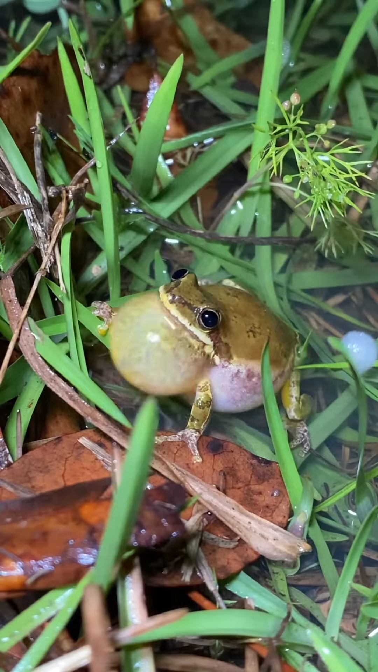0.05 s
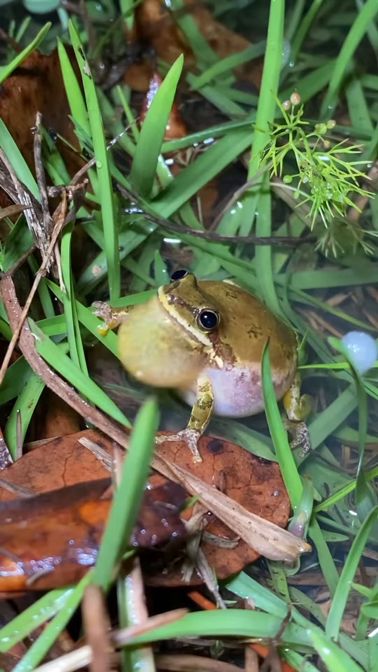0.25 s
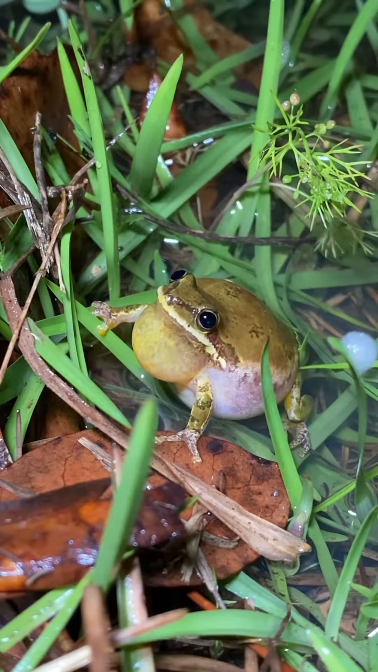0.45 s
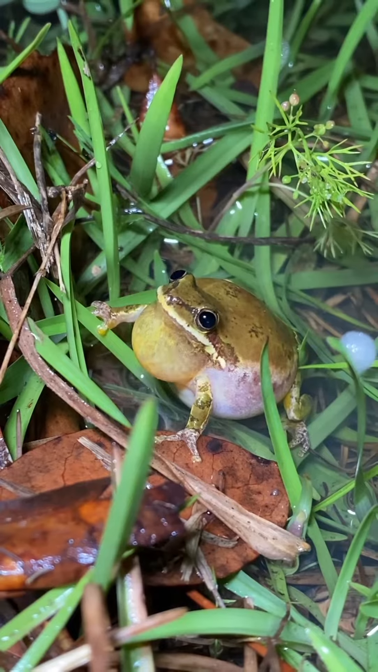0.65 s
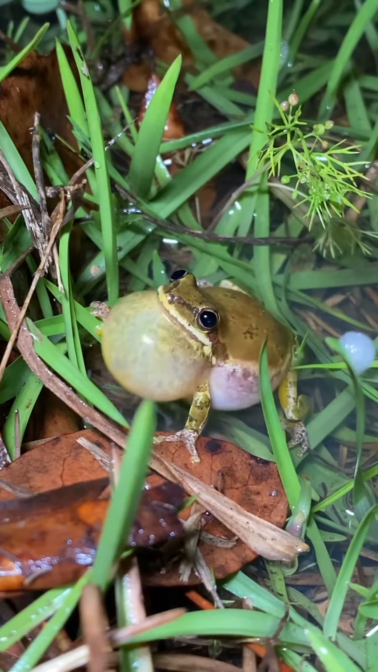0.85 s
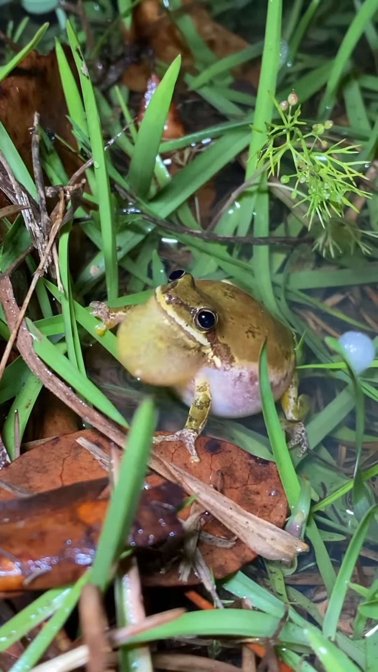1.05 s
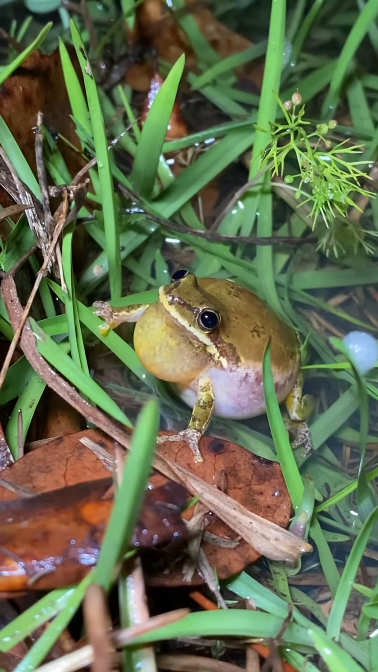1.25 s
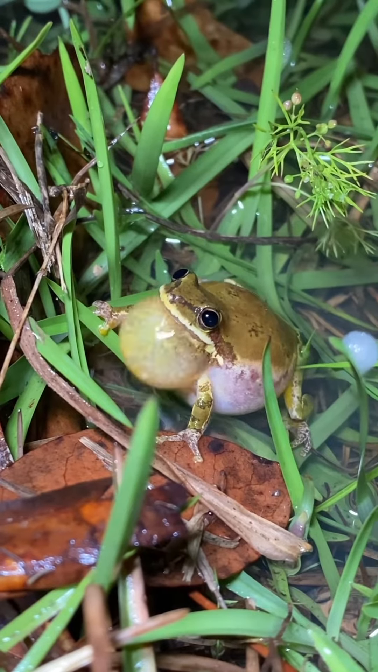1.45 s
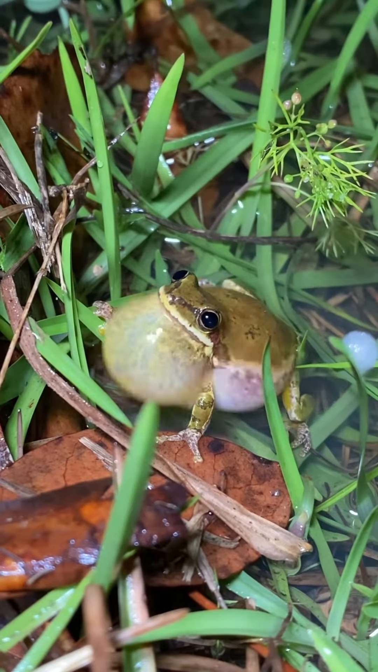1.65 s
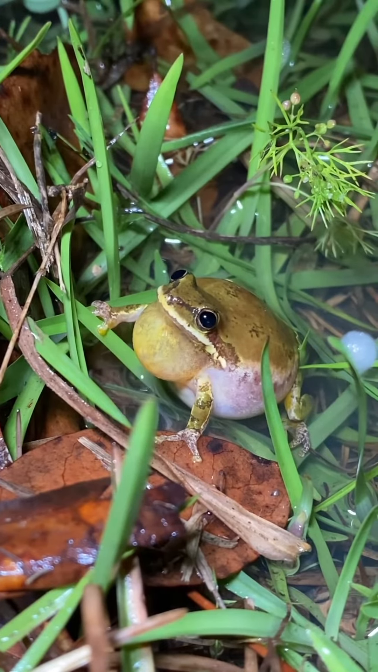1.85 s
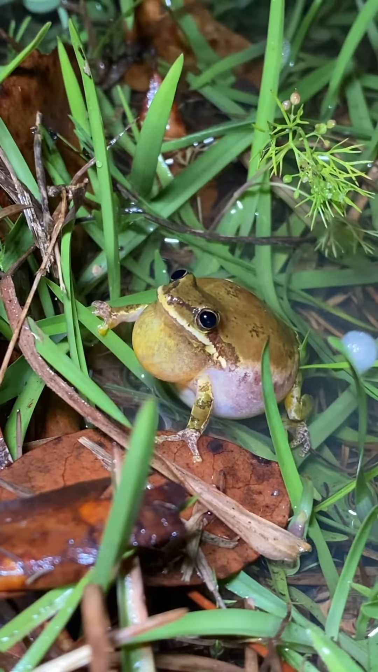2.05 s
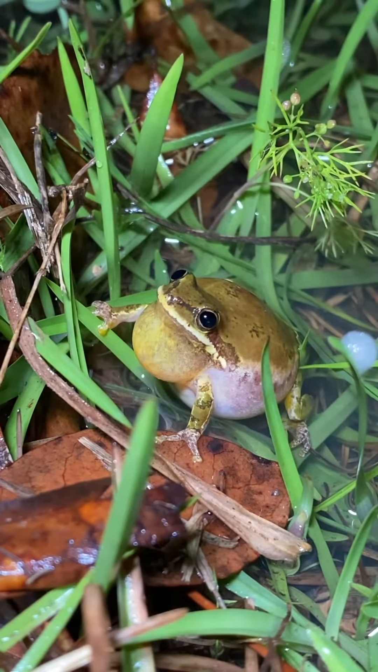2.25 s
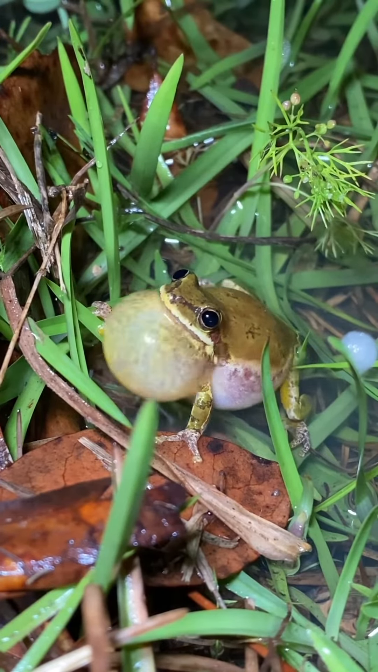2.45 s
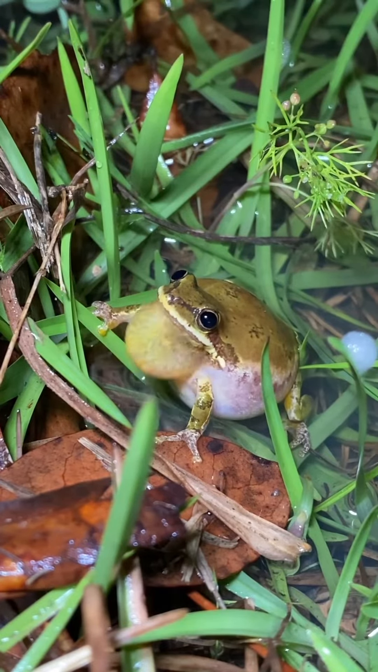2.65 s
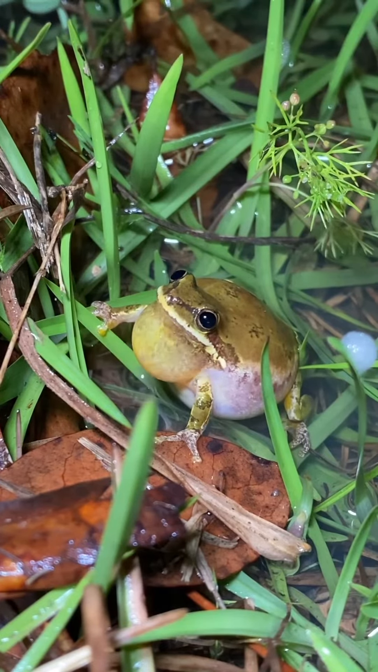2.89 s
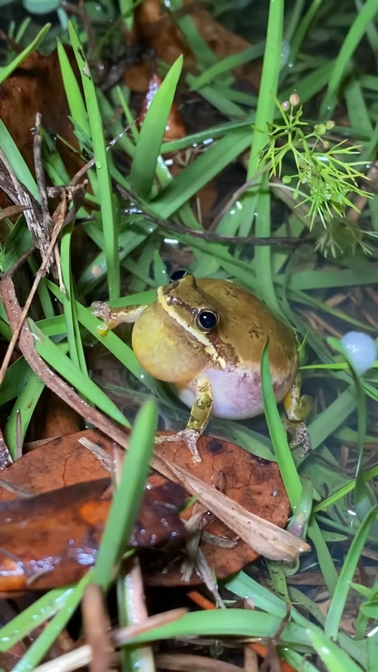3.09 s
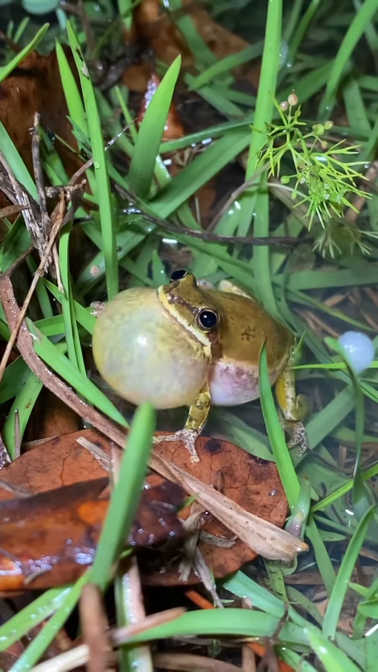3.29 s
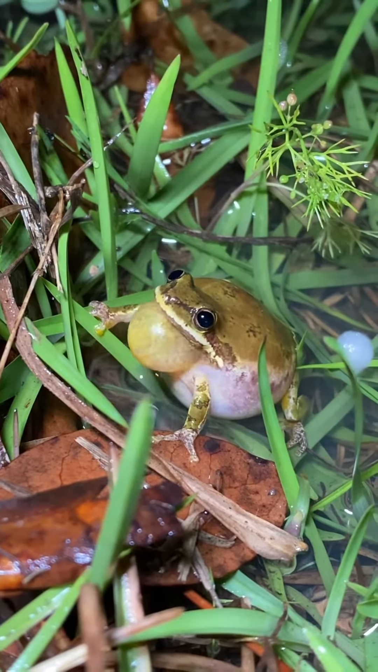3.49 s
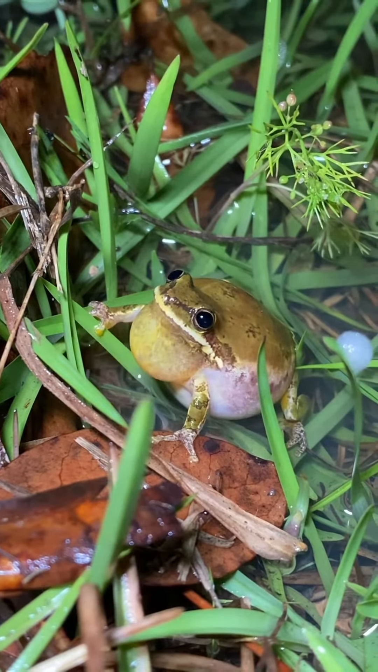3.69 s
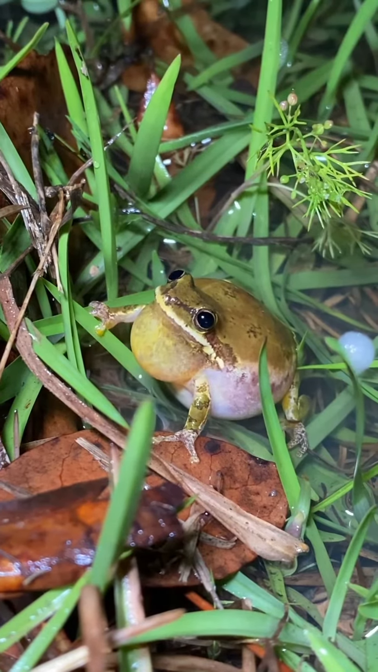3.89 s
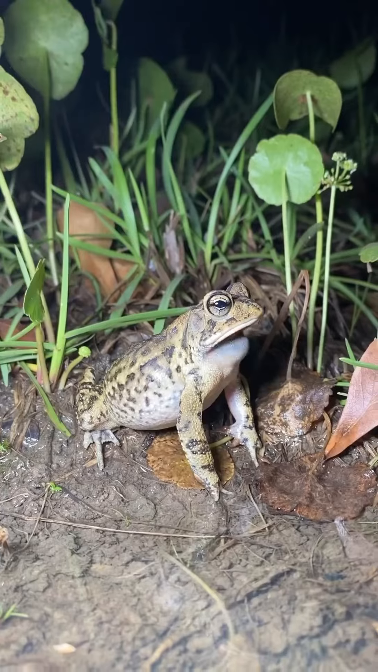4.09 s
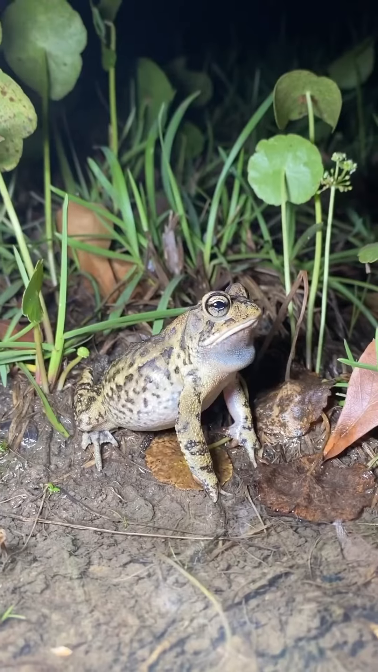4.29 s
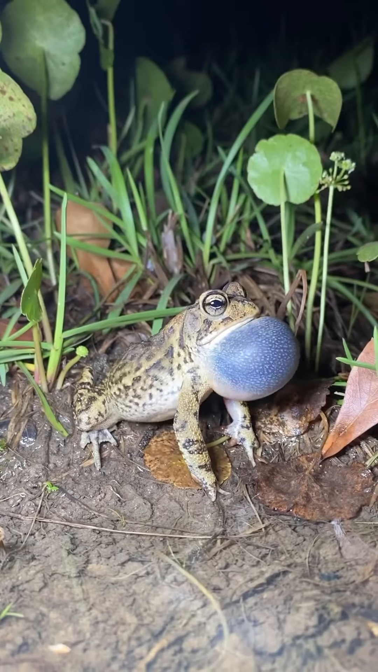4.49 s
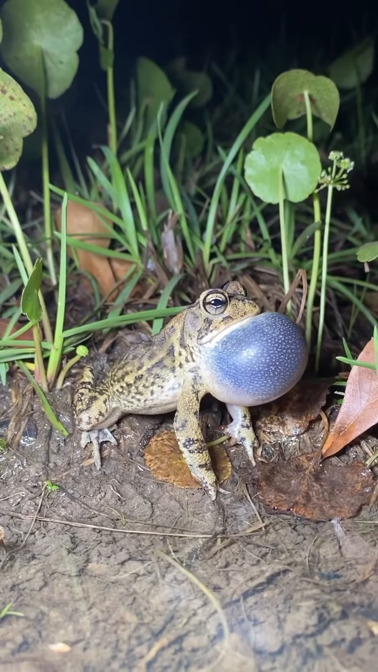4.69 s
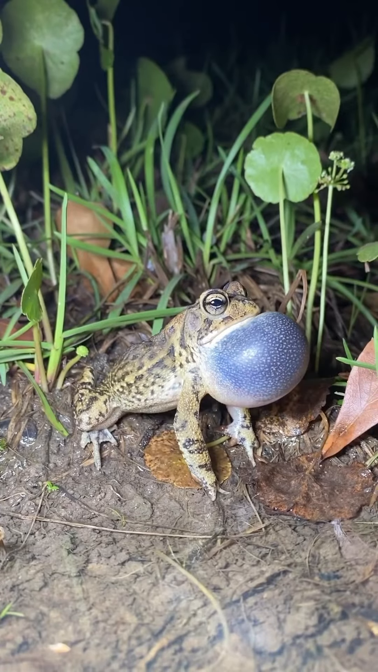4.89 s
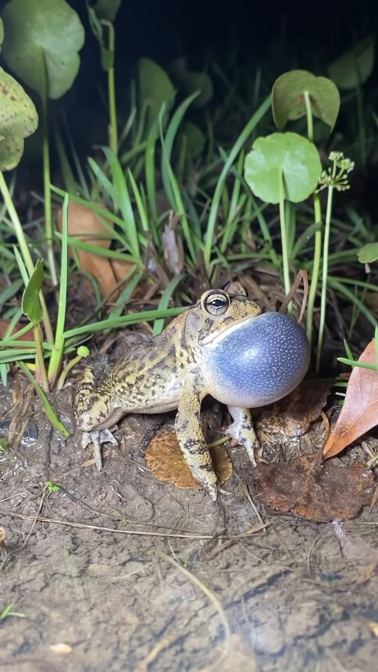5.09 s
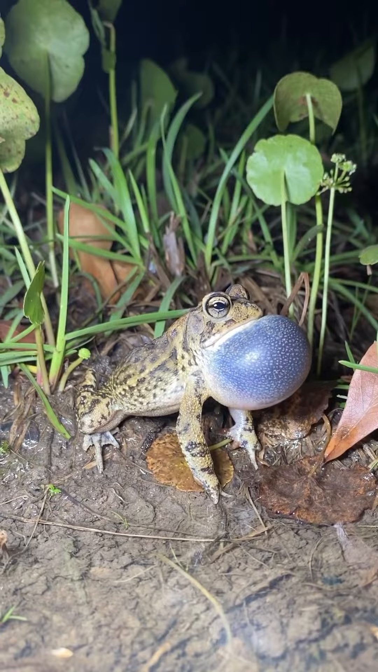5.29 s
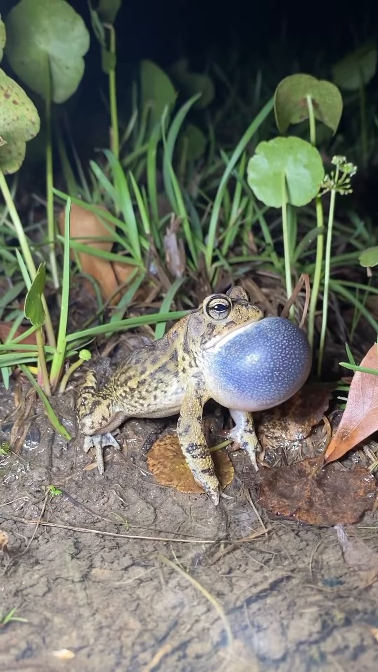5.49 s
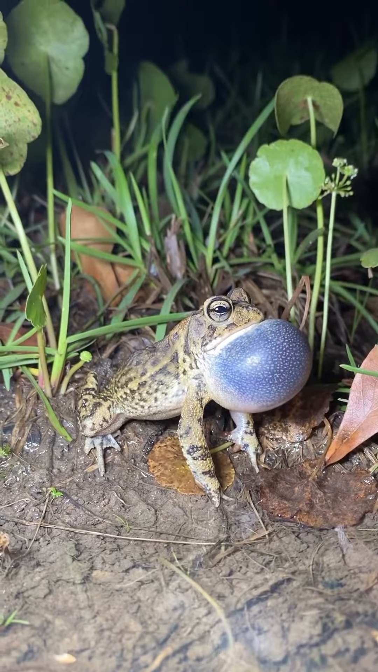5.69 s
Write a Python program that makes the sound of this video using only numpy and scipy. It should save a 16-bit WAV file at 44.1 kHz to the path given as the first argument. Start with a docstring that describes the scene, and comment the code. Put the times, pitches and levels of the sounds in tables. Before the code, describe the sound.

Short, buzzy frog croaks with neighbours answering and a faint cricket cut to a toad's steady, whistling trill at night.

```python
"""Night at a pond edge. A tree frog croaks close by: vocal-fold impulses, about 100 pulses a second,
excite the resonances of its throat and sac. Neighbours answer over a cricket and a far chorus, and one
short pop sounds at 1.3 s. Near 4 s the scene cuts to a quieter bank with two faint answers.
There a toad swells into a long, steady trill of whistled pulses, rising in level as its sac fills."""
import sys
import numpy as np
from scipy import signal
from scipy.fft import rfft, irfft
from scipy.io import wavfile
from scipy.ndimage import uniform_filter1d

SR = 44100
rng = np.random.default_rng(int(sys.argv[2]) if len(sys.argv) > 2 else 0)


def to_wav(s):
    """Save 16-bit WAV."""
    ch = np.atleast_2d(s).T  # columns
    pcm = np.round(np.clip(ch, -1, 1) * 32767)  # PCM
    wavfile.write(sys.argv[1], SR, pcm.astype(np.int16))


N = 253134
TIME = np.arange(N) / SR
PULSE_HZ = np.fft.rfftfreq(2048, 1 / SR)
CUT_S, BANK_S, TRILL_START_S = 3.9545, 3.976, 4.4223  # near frog ends, bank begins, toad begins

# Croaks: (first pulse [s], last pulse [s], pause to cluck [s], cluck level [dB], second cluck [dB])
CROAKS = [(-.0566, .0723, .0107, -20.5, -34), (.7193, .869, .014, -25, -40),
          (1.3664, 1.5055, .0105, -21, -22), (2.2954, 2.4243, .0103, -20, -34),
          (3.0712, 3.221, .0137, -24.5, -38), (3.9243, 4.0737, .014, -24, -38)]
# Response of the near frog's body: (frequency [Hz], gain [dB])
FROG_BODY = [(200, -40), (550, -40.5), (830, -12.5), (1100, -2.5), (1400, -9), (1800, -7.5), (2500, -6),
             (3200, -6), (3900, -27), (4600, -22), (5600, -33.5), (6700, -57), (9400, -31), (13000, -55)]
def near_frog(pulses_per_s=101, tighten_share=.68, sac_fill_s=.032):
    """Source and filter: tightening folds rise in pitch, while the sac rings less as it fills."""
    out, body = np.zeros(N), minimum_phase(FROG_BODY)
    slack_hz, tight_hz = 1100, 1425
    sac_hz, sac_width_hz, full_db, empty_db = 1052, 86, 6.5, 25
    for first, last, pause, cluck_db, second_db in CROAKS:
        share = np.linspace(0, 1, round((last - first) * pulses_per_s) + 1)
        centred = 2 * share - 1
        times = first + (last - first) * share + .002 * (centred ** 5 - centred)  # slower at both ends
        times += np.cumsum(.00006 * rng.standard_normal(len(times)))  # each period wavers
        levels = -14.5 + envelope_db(share, rise=.06, rise_db=1, fall=.7, fall_db=4.5)
        pitches = glide(share / tighten_share, slack_hz, tight_hz)
        for s, db, fold_hz in zip(times, levels, pitches):
            empty = np.exp((first - s) / sac_fill_s)
            sac = resonance(sac_hz, sac_width_hz, full_db + (empty_db - full_db) * empty)
            bright_edge = resonance(hz=4690, width_hz=1300, db=14.5 * empty)
            throat = resonance(2 * fold_hz, width_hz=290, db=8)
            add_pulse(out, s, db, fold_hz, body * throat * sac * bright_edge, jitter=.018)
        # a faint pulse opens the croak and two clucks close it
        lead_in = body * resonance(sac_hz, sac_width_hz, full_db)
        add_pulse(out, first - .0097, db=-24.5, fold_hz=slack_hz, body=lead_in, jitter=.03)
        add_cluck(out, last + pause, cluck_db)
        add_cluck(out, last + pause + .026, second_db)
    heard = place(out, lead_samples=1.3, balance_db=-1.3) + scatter(out, t60=.08, wet_db=-17)
    return heard * np.clip((CUT_S - TIME) / .0005, 0, 1)


# Slaps of the vocal folds within one pulse: (delay [fold cycles], level [dB])
FOLD_SLAPS = [(-2.5, -8.5), (-7.5, -15), (-0.5, 3.5), (0.5, -10.5), (2.28, -2)]
def add_pulse(mix, s, db, fold_hz, body, jitter):
    """Superposition: each slap of the folds excites a delayed copy of the body's impulse response."""
    cycles, slap_db = np.transpose(FOLD_SLAPS)
    margin_s = 256 / SR
    delays = margin_s + (cycles + jitter * rng.standard_normal(len(cycles))) / fold_hz
    slaps = amp(slap_db) @ np.exp(-2j * np.pi * np.outer(delays, PULSE_HZ))
    pulse = irfft(body * slaps)
    pulse *= np.sqrt(SR / 100 / np.sum(pulse ** 2))  # unit rms over 10 ms
    add(mix, s - margin_s, amp(db) * pulse)


# Harmonics of a cluck: (frequency [multiple of the fundamental], level [dB])
CLUCK_HARMONICS = [(1, -3), (2, -3.5), (3, -4.5)]
def add_cluck(mix, s, db, length_s=.0094):
    """Free vibration: the slack folds swing for a few cycles, a pitched blip centred on time s."""
    t = TIME[TIME < length_s]
    hz = 1063 + 13 * (db + 23)  # weaker clucks are lower
    tone = sum(amp(db_k) * np.sin(2 * np.pi * (k * hz * t + rng.random())) for k, db_k in CLUCK_HARMONICS)
    add(mix, s - length_s / 2, amp(db) * unit_rms(np.hanning(len(t)) * tone))


# Pace of the trill: (time [s], rate [pulses/s])
TRILL_RATE = [(4.423, 58.58), (4.687, 62.07), (5.15, 59.19), (5.74, 56.78)]
# Overtones of the whistle: (frequency [multiple of the fundamental], level [dB], change at onset [dB])
TOAD_OVERTONES = [(2.07, -39, 9), (2.889, -51, 11), (5.14, -49.5, -14.5)]
# Air rasping through the toad's folds: (frequency [Hz], spectral density [dB])
RASP = [(200, -23.5), (600, -1.5), (1300, 6), (3300, -10), (4700, -9), (5900, -10), (6800, -27.5),
        (9600, -16.5), (12500, -37.5), (15200, -22.5)]
def toad(pulse_s=.0113, rasp_likeness=.77, overtone_settle_s=.26, body_hz=1164, knock_s=.002):
    """Amplitude and frequency modulation: each pulse is a whistle that swells and sags in pitch."""
    out, t = np.zeros(N), TIME[:SR // 70]
    pulse_count = np.cumsum(curve(TRILL_RATE, TIME)[0] * (TIME >= TRILL_START_S)) / SR
    times = TIME[1:][np.diff(np.ceil(pulse_count)) > 0]
    breath = coloured_noise(RASP, COHERENCE)[0]
    common_rasp, *fresh_rasps = breath[:(len(times) + 1) * len(t)].reshape(-1, len(t))
    # each pulse knocks the body into a low ring
    knock = amp(-30) * t / knock_s * np.exp(1 - t / knock_s) * np.sin(2 * np.pi * body_hz * t)
    for s, fresh_rasp, db, hz, harsh in zip(times, fresh_rasps, *trill_contour(times - TRILL_START_S)):
        level_drift, speed_drift, pitch_drift = rng.standard_normal(3)
        share = np.minimum(t * (1 + .066 * speed_drift) / pulse_s, 1)
        swell = share ** 1.35 * (1 - share) ** 2.7  # quick rise, slower fall
        swell /= swell.max()
        sag = 1.0086 - .42 * share ** 3.16
        phase = 2 * np.pi * np.cumsum(hz * sag * (1 + .003 * pitch_drift)) / SR
        early = np.exp((TRILL_START_S - s) / overtone_settle_s)
        overtones = sum(amp(db_k + early * lift) * np.sin(k * phase) for k, db_k, lift in TOAD_OVERTONES)
        snap = amp(5) * harsh * np.exp(-((t - .0021) / .0008) ** 2) * np.sin(phase)  # the folds snap open
        whistle = unit_rms(swell * (np.sin(phase) + overtones) + snap)
        rasp = rasp_likeness * common_rasp + np.sqrt(1 - rasp_likeness ** 2) * fresh_rasp
        rasp *= amp(-41) + harsh * amp(-19)
        add(out, s, amp(db + .5 * level_drift) * (whistle + swell * rasp + knock))
    return place(out, lead_samples=-1.5, balance_db=.1) + scatter(out, t60=.06, wet_db=-25)


def trill_contour(age_s, fill_s=.065, drop_after_s=.35, scoop_s=.096, harsh_s=.14, taut_harshness=.17):
    """Onset transient: level and pitch climb and harshness fades as the slack sac fills."""
    since_drop_s = np.maximum(age_s - drop_after_s, 0)
    db = -13.5 - 20.5 * np.exp(-age_s / fill_s)
    db -= 1.98 * (since_drop_s > 0) + 3 * since_drop_s  # the level steps down 2 dB, then slowly fades
    hz = 2007 - 457 * np.exp(-age_s / scoop_s) + 67.6 * age_s
    slack = np.maximum(1 - (age_s / harsh_s) ** 2, 0)
    return db, hz, taut_harshness + (1 - taut_harshness) * slack


# Neighbours' calls: (start [s], end [s], level [dB], top fold pitch [Hz])
ANSWERS = [(0.131, .411, -35, 1575), (0.293, 0.524, -32.5, 1663), (.988, 1.247, -34.5, 1495),
           (1.065, 1.356, -32, 1603), (1.515, 1.746, -33.5, 1392), (1.638, 1.828, -35, 1660),
           (1.847, 2.108, -30.5, 1593), (1.982, 2.165, -38.5, 1690), (2.151, 2.221, -39.5, 1440),
           (2.235, 2.42, -33.5, 1365), (2.486, 2.774, -34.5, 1583), (2.658, 2.871, -33, 1672),
           (3.357, 3.619, -32.5, 1513), (3.403, 3.722, -37.5, 1696), (3.756, 4.015, -39.5, 1633),
           (4.149, 4.334, -52.5, 1670), (4.378, 4.47, -56.5, 1450)]
# Response of a neighbour's body, heard through grass: (frequency [Hz], gain [dB])
FAR_BODY = [(300, -38), (800, -20.5), (1200, -11), (1500, -20), (1900, -4), (2400, -16), (3100, 1),
            (3500, -6.5), (3900, -18), (4500, -13.5), (7200, -61), (10000, -27), (12500, -46),
            (15200, -47.5)]
# Direct and reflected paths; low tones arrive mostly by reflection: (frequency [Hz], gain [dB])
DIRECT_PATH = [(1700, -9.5), (2700, 1.5)]
REFLECTED_PATH = [(1700, -3), (2700, -1)]
def neighbours(pulses_per_s=96, typical_fold_hz=1598, dull_below_db=-35):
    """Acoustic scaling: smaller frogs have higher folds, and their body resonances rise in step."""
    out, sac = np.zeros(N), resonance(hz=1300, width_hz=430, db=14.5)
    treble = np.clip((PULSE_HZ - 3500) / 1200, 0, 1)
    rates = pulses_per_s * np.exp(.05 * rng.standard_normal(len(ANSWERS)))
    for (start, end, db, top_hz), rate in zip(ANSWERS, rates):
        times = np.arange(start, end, 1 / rate)
        times += .00018 * rng.standard_normal(len(times))
        share = np.linspace(0, 1, len(times))
        levels = db + envelope_db(share, rise=.23, rise_db=10, fall=.046, fall_db=4)
        body = sac * minimum_phase([(hz * top_hz / typical_fold_hz, gain) for hz, gain in FAR_BODY])
        body *= amp(-.97 * max(dull_below_db - db, 0) * treble)  # faint, distant callers lose treble
        for s, pulse_db, fold_hz in zip(times, levels, glide(share, .88 * top_hz, top_hz)):
            throat = resonance(2 * fold_hz, width_hz=230, db=7)
            add_pulse(out, s, pulse_db, fold_hz, body * throat, jitter=.045)
    direct = place(filtered(out, DIRECT_PATH), lead_samples=.2, balance_db=.5)
    return direct + scatter(filtered(out, REFLECTED_PATH), t60=.082, wet_db=-2)


# A hard-edged pop: (time [s], duration [s], peak level [dB], frequency [Hz])
POPS = [(1.2673, 0.00431, -10, 990)]
def pop(decay_s=.0023):
    """Damped oscillation: a low ring whose abrupt start and stop spread its spectrum."""
    out = np.zeros(N)
    for s, length, db, hz in POPS:
        t = TIME[TIME < length]
        add(out, s, amp(db) * np.exp(-t / decay_s) * np.cos(2 * np.pi * hz * t))
    return place(out, lead_samples=1, balance_db=-4)


# One wing stroke: (position [share of the stroke], amplitude [relative], frequency [Hz])
WING_STROKE = [(0, 0.8, 6120), (.15, 0, 5934), (.4, 1, 5840), (.6, 0.31, 5690), (.8, 0.22, 5297),
               (1, 0, 5184)]
def cricket(start_s=.006, strokes_per_s=38.44, waver_hz=60, db=-53.5):
    """Stridulation: each wing stroke is a whistle that falls as the file slows."""
    stroke = ((TIME - start_s) * strokes_per_s) % 1
    swell, hz = curve(WING_STROKE, stroke)
    swell *= np.clip(np.minimum(stroke, 1 - stroke) / .06, 0, 1)
    waver = unit_rms(uniform_filter1d(rng.standard_normal(N), size=120))
    phase = 2 * np.pi * np.cumsum(hz + waver_hz * waver) / SR
    song = amp(db) * unit_rms(swell * np.sin(phase))
    heard = place(song, lead_samples=.5, balance_db=0) + scatter(song, t60=.12, wet_db=-9)
    return heard * (TIME < BANK_S)


# Pond chorus, its overtones, bank chorus and night air: (frequency [Hz], spectral density [dB])
POND_CHORUS = [(290, -48.5), (500, -35), (615, -57.5), (677, -20.5), (833, -32.5), (860, -19.5), (910, -22),
               (993, -17.5), (1170, 0.5), (1330, -2), (1380, -12.5), (2300, -26), (2390, -19), (2870, -2.5),
               (3370, -11.5), (4380, -31.5), (7410, -120)]
CHORUS_OVERTONES = [(3300, -40), (4400, -2), (5400, 1), (6400, -32), (8200, -35), (9500, -16), (11500, -20),
                    (13000, -44)]
BANK_CHORUS = [(240, -40.5), (400, -14), (523, -33.5), (708, -16.5), (760, -17.5), (854, -22), (1100, -4),
               (1240, 1.5), (1870, -27), (2420, -12.5), (2720, -3), (3030, -10.5), (3370, -0.5),
               (4380, -31.5), (7410, -120)]
AIR_RUMBLE = [(12, -52), (20, -27), (70, 4), (114, -4.5), (157, -8.5), (304, -19), (357, -20.5), (500, -18),
              (650, -47.5), (1100, -120)]
# Likeness of left and right: (frequency [Hz], correlation [-1 to 1])
COHERENCE = [(60, 1), (130, 0.83), (280, -0.98), (620, 0.57), (1340, -0.64), (2920, 0.96)]
def chorus_and_air(throb_db=2.5):
    """Incoherent summation: far frogs blur into noise throbbing at their pulse rates, over rumbling air."""
    pulse_rates = rng.uniform(94, 110, size=6)
    beating = unit_rms(sum(np.sin(2 * np.pi * (rate * TIME + rng.random())) for rate in pulse_rates))
    throb = unit_rms(amp(throb_db * beating))
    air = coloured_noise(AIR_RUMBLE, coherence=[(20, .95), (500, .98)])
    chorus = amp(-38.5) * coloured_noise(POND_CHORUS, COHERENCE)
    chorus += amp(-57) * coloured_noise(CHORUS_OVERTONES, COHERENCE)
    pond = throb * chorus + amp(-59) * air
    bank = amp(-57.5) * throb * coloured_noise(BANK_CHORUS, COHERENCE) + amp(-66) * air
    return np.where(TIME < BANK_S, pond, bank)


def envelope_db(share, rise, rise_db, fall, fall_db):
    """Attack, hold and release; rise and fall are shares of the call's length."""
    return -rise_db * np.maximum(1 - share / rise, 0) - fall_db * np.maximum(1 - (1 - share) / fall, 0)


def glide(share, low_hz, high_hz):
    """Tension raises pitch: the folds tighten quickly at first, then level off."""
    return low_hz + (high_hz - low_hz) * np.sin(np.pi / 2 * np.minimum(share, 1))


def resonance(hz, width_hz, db):
    """Second-order resonance: a response that lifts one band by db."""
    return 1 + (amp(db) - 1) / (1 + 1j * (PULSE_HZ ** 2 - hz ** 2) / (width_hz * PULSE_HZ + 1e-9))


def minimum_phase(colour):
    """Causal response: the phase follows from the log gain by the Hilbert transform."""
    log_gain = np.log(amp(spectrum(colour, PULSE_HZ)))
    mirrored = np.concatenate([log_gain, log_gain[-2:0:-1]])
    return np.exp(np.conj(signal.hilbert(mirrored)))[:len(PULSE_HZ)]


def place(x, lead_samples, balance_db):
    """Localisation by time and level: positive values favour the left channel."""
    left = np.exp(1j * np.pi * np.fft.rfftfreq(N) * lead_samples) * amp(balance_db / 2)
    return irfft(rfft(x) * np.array([left, 1 / left]), N)


def scatter(x, t60, wet_db):
    """Diffuse reflection: stems and banks return a short tail, independent in each channel."""
    t = TIME[:SR // 2]
    tail = rng.standard_normal((2, len(t))) * amp(-60 * t / t60) * (t > .003)
    tail /= np.linalg.norm(tail, axis=1, keepdims=True)
    return amp(wet_db) * signal.oaconvolve(x[None], tail, axes=1)[:, :N]


def coloured_noise(colour, coherence):
    """Partial coherence: shaped noise of unit rms, partly shared by the two channels."""
    hz = np.fft.rfftfreq(N, 1 / SR)
    left, independent = rfft(rng.standard_normal((2, N)))
    shared = spectrum(coherence, hz)
    right = shared * left + np.sqrt(1 - shared ** 2) * independent
    return unit_rms(irfft(np.array([left, right]) * amp(spectrum(colour, hz)), N))


def filtered(x, colour):
    """Zero-phase filtering by a table of (frequency [Hz], gain [dB])."""
    return irfft(rfft(x) * amp(spectrum(colour, np.fft.rfftfreq(N, 1 / SR))), N)


def spectrum(points, hz):
    """Interpolation on a log-frequency axis."""
    f, value = np.transpose(points)
    return np.interp(np.log(hz + 1), np.log(f + 1), value)


def curve(rows, at):
    """Linear interpolation of each column along the first."""
    first, *columns = np.transpose(rows)
    return [np.interp(at, first, c) for c in columns]


def add(mix, s, sound):
    """Superposition of a sound on the mix at time s."""
    start = round(s * SR)
    sound = sound[max(-start, 0):]
    part = mix[max(start, 0):][:len(sound)]
    part += sound[:len(part)]


def amp(db):
    """Decibels to amplitude ratio."""
    return 10 ** (np.asarray(db) / 20)


def unit_rms(x):
    """Normalisation to an rms of 1."""
    return x / np.sqrt(np.mean(x ** 2) + 1e-20)


def scene():
    """Superposition of all sources: the pond, then the toad's bank."""
    bank_answers_s = ANSWERS[-2][0]
    answers = neighbours() * ((TIME < BANK_S) | (TIME > bank_answers_s))  # pond callers end at the cut
    return near_frog() + answers + cricket() + pop() + toad() + chorus_and_air()


def record(dry):
    """Band limiting: a linear-phase low-pass at 15.9 kHz."""
    low_pass = signal.firwin(511, 15900, window=("kaiser", 9), fs=SR)
    return signal.oaconvolve(dry, low_pass[None], "same")


dry = scene()
out = record(dry)
to_wav(out)
```